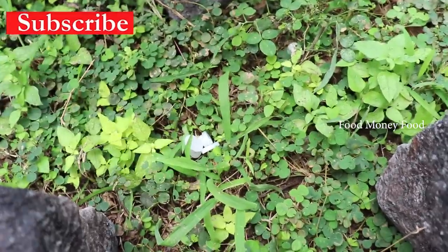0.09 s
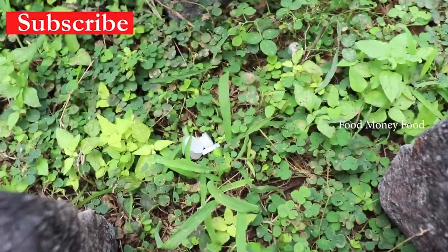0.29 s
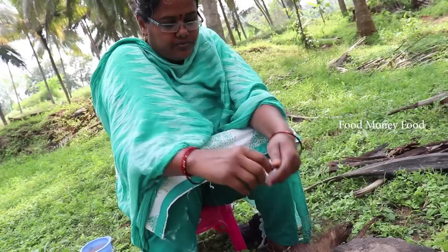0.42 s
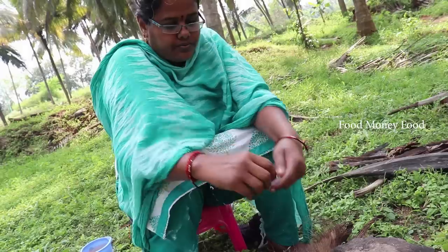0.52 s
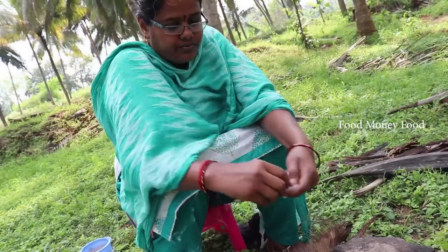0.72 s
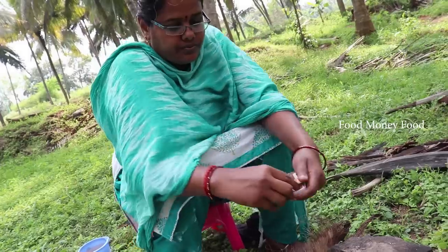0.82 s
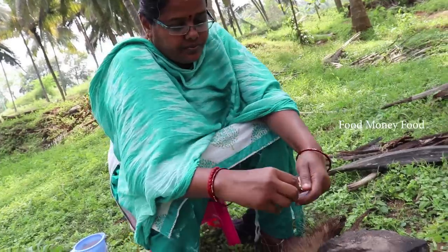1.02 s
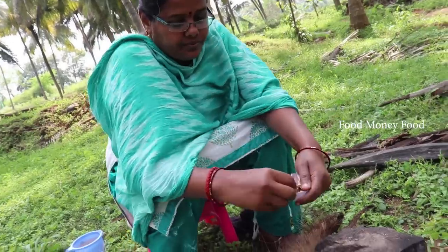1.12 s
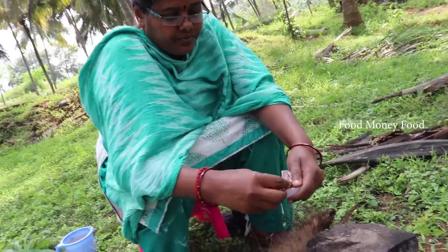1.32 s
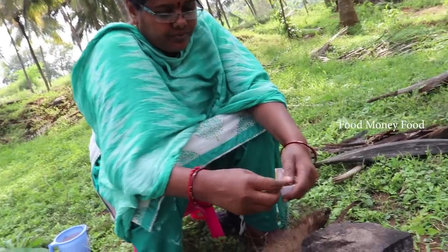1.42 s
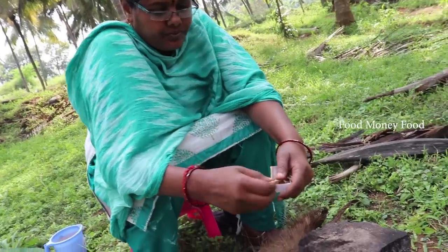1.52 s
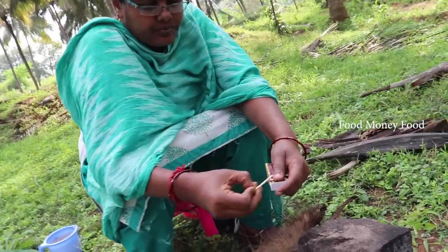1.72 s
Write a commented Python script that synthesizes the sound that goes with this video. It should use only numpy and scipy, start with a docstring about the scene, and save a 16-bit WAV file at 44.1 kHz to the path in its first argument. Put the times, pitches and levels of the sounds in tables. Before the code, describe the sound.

Matches rattle and scrape inside a small box, close to the microphone outdoors. A short hiss and hollow knock come first, then busy dry clicks with wind buffeting the left side, sparse soft rattles and a late hiss.

```python
"""Outdoors, close to a pair of hands, over the noise hiss of leaves and distance and a low rumble with a hum.
A short dry hiss and a rattle lead to a hollow knock on the ground: ringing sines over rough grit.
Matches then rattle and scrape in their box (clicks into resonances) among dry hisses (filtered noise) and
ticks (snaps of noise), while wind, lumpy low noise, buffets the left microphone port.
Sparse, soft rattles follow; near the end a longer hiss flares on the left."""
import sys
import numpy as np
from scipy import signal
from scipy.io import wavfile
from scipy.ndimage import uniform_filter1d

SR = 44100
rng = np.random.default_rng(int(sys.argv[2]) if len(sys.argv) > 2 else 0)


def pcm_store(signal):
    """Save signal as 16-bit PCM."""
    levels = np.round(np.clip(np.atleast_2d(signal), -1, 1) * 32767)
    wavfile.write(sys.argv[1], SR, levels.astype(np.int16).T)


N = 77175


def amp(db):
    """dB to gain."""
    return 10 ** (np.asarray(db) / 20)


def unit(x):
    """Scale to rms one."""
    return x / np.sqrt(np.mean(x ** 2) + 1e-20)


def level(rows, outside_db=None):
    """Gain along a (s, dB) curve; outside_db holds before and after it."""
    s, db = np.transpose(rows)
    return amp(np.interp(np.arange(N) / SR, s, db, outside_db, outside_db))


def at_hz(points, hz):
    """Read a spectrum on a log frequency axis."""
    points_hz, values = np.transpose(points)
    return np.interp(np.log(hz), np.log(points_hz), values)


def pan(left_minus_right_db):
    """Left and right gains."""
    return amp([[left_minus_right_db / 2], [-left_minus_right_db / 2]])


def shape(start_s, rise_s, hold_s, fall_s):
    """Linear rise, hold, exponential fall."""
    t = np.arange(N) / SR - start_s
    return np.clip(t / rise_s, 0, 1) * np.exp(-np.clip(t - rise_s - hold_s, 0, None) / fall_s)


def drift(rate_hz):
    """Slow random wander of about rms one, computed every 40 samples."""
    r = np.exp(-2 * np.pi * rate_hz * 40 / SR)
    white = rng.standard_normal(N // 40 + 2002)
    slow = signal.lfilter([1], [1, -2 * r, r * r], white)[2000:]  # skip the settling
    return np.interp(np.arange(N) / 40, np.arange(len(slow)), unit(slow - slow.mean()))


def resonance(x, hz, width_hz):
    """Two-pole resonator, peak gain one."""
    r = np.exp(-np.pi * width_hz / SR)
    gain = (1 - r * r) / 2
    return signal.lfilter([gain, 0, -gain], [1, -2 * r * np.cos(2 * np.pi * hz / SR), r * r], x)


def double_resonance(x, hz, width_hz, second_width_hz):
    """Two resonators in series on one frequency."""
    return resonance(resonance(x, hz, width_hz), hz, second_width_hz)


def butter(x, order, hz, kind):
    """Butterworth filter."""
    return signal.sosfilt(signal.butter(order, hz, kind, fs=SR, output="sos"), x)


def bands(spectrum, patchy_db, likeness):
    """Half-octave bands of stereo noise, each with its own level, flicker and left-right likeness; rms one."""
    lowest_hz, highest_hz = spectrum[0][0], spectrum[-1][0]
    edges_hz = lowest_hz * 2 ** np.arange(-.5, np.log2(highest_hz / lowest_hz) + .5, .5)
    white = rng.standard_normal((2, 2, N))  # neighbouring bands use separate noise
    out = 0
    for k, (low_hz, high_hz) in enumerate(zip(edges_hz, edges_hz[1:])):
        mid, side = butter(white[k % 2], 2, [low_hz, min(high_hz, SR * .45)], "band")
        hz = np.sqrt(low_hz * high_hz)
        alike = np.clip(at_hz(likeness, hz), -1, 1)
        gain = amp(at_hz(spectrum, hz) + patchy_db * drift(20.0))
        out = out + gain * (np.sqrt(1 + alike) * mid + np.sqrt(1 - alike) * side * [[1], [-1]])
    return unit(out)


# Air spectrum. Each row: frequency in Hz, relative density in dB per Hz.
AIR_SPECTRUM = [(30, -31), (55, -13.5), (110, -6), (235, -6), (440, -12), (900, -7.5), (2000, -9),
                (3400, -10.5), (4400, -16.5), (6500, -18.5), (9000, -25.5), (11500, -29), (15500, -32.5)]
# Air level before its trim. Each row: time in seconds, level in dB.
AIR_LEVEL_CURVE = [(0.0, -46), (0.37, -44.5), (0.73, -45.5), (1.028, -45), (1.276, -47), (1.55, -48),
                   (1.75, -45)]
# Left-right likeness of the air. Each row: frequency in Hz, correlation from -1 to 1.
AIR_LIKENESS = [(60, 0.96), (180, 0.82), (550, 0.6), (1650, 0.072), (4970, -0.035), (15000, -0.2)]
AIR_TRIM_DB = 1.5


def air():
    """Leaves and distance: broadband noise, alike left and right only at low frequencies."""
    noise = bands(AIR_SPECTRUM, patchy_db=1.0, likeness=AIR_LIKENESS)
    return amp(AIR_TRIM_DB) * level(AIR_LEVEL_CURVE) * noise


# Rumble spectrum. Each row: frequency in Hz, relative density in dB per Hz.
RUMBLE_SPECTRUM = [(29, -29), (50, -3), (81, 1.5), (300, -9), (480, -6.5), (531, -8.5), (716, -23),
                   (899, -20), (1500, -22), (1950, -27), (3300, -120)]
# Rumble level. Each row: time in seconds, level of the noise in dB.
RUMBLE_LEVEL_CURVE = [(0, -44), (.06, -45.5), (.13, -39), (.19, -40), (.26, -44.5), (.33, -45), (.44, -50),
                      (.47, -57.5), (1.75, -71.5)]
HUM_HZ, HUM_WIDTH_HZ, HUM_RE_NOISE_DB = 82, 2.9, -7.5


def rumble():
    """Low, nearly centred noise, plus a hum that wavers as noise through a narrow resonance does."""
    hum = unit(resonance(rng.standard_normal(N), HUM_HZ, HUM_WIDTH_HZ))
    noise = bands(RUMBLE_SPECTRUM, patchy_db=3.5, likeness=[(40, 1.0), (1500, 0.81)])
    return level(RUMBLE_LEVEL_CURVE) * pan(1.3) * (noise + amp(HUM_RE_NOISE_DB) * hum)


# Wind gusts before the port gains. Each row: time in seconds, level in dB.
WIND_LEVEL_CURVE = [(0.5, -51), (0.52, -43.5), (0.55, -73), (0.582, -51), (0.604, -56), (0.646, -58),
                    (0.67, -36.5), (0.688, -37.5), (0.708, -47), (0.804, -38.5), (0.874, -64), (0.896, -41),
                    (0.948, -58.5), (1.004, -38.5), (1.034, -60), (1.132, -55), (1.156, -91), (1.2, -75)]
WIND_HZ, WIND_WIDTH_HZ = 65, 32
WIND_LEFT_DB, WIND_RIGHT_DB = 5, -12.5


def wind():
    """Wind on the ports, mostly the left: lumpy low noise, its swells partly evened out."""
    lumps = unit(double_resonance(rng.standard_normal(N), WIND_HZ, WIND_WIDTH_HZ, 2 * WIND_WIDTH_HZ))
    power = uniform_filter1d(lumps ** 2, size=1200)
    lumps = lumps / np.sqrt(power + 0.26)
    return level(WIND_LEVEL_CURVE, outside_db=-105) * lumps * amp([[WIND_LEFT_DB], [WIND_RIGHT_DB]])


# Tiny ticks. Each row: start in seconds, level in dB, centre in Hz, width in Hz, left minus right in dB.
TICK_ROWS = [(0.2185, -37.5, 4830, 7000, 11), (.219, -37.5, 11600, 6000, -3), (0.3352, -41, 6730, 8000, 8),
             (0.509, -49, 7000, 5000, 8), (1.243, -58, 14300, 2500, -18), (1.2563, -46.5, 3980, 2000, 6),
             (1.566, -50, 7700, 4040, 13)]
TICK_S = 0.0018


def ticks():
    """Millisecond snaps of noise, each in one broad resonance."""
    noise = rng.choice([-1., 1.], N)
    out = 0
    for s, db, hz, width_hz, side_db in TICK_ROWS:
        snap = unit(double_resonance(noise, hz, width_hz, width_hz))
        out = out + amp(db) * pan(side_db) * snap * shape(s, TICK_S / 4, TICK_S / 2, TICK_S)
    return out


# Hiss bursts. Each row: start in seconds, rise in seconds, hold in seconds, fall time constant in seconds,
# level in dB before the band filter, lower edge in Hz, upper edge in Hz, left minus right in dB.
HISS_ROWS = [(0.11, 0.023, 0.092, 0.0036, -44, 3400, 15400, 5.5),
             (0.331, 0.0022, 0.031, 0.011, -44.5, 7000, 15000, -3),
             (0.4535, .0004, 0.029, 0.023, -36, 9400, 18000, -4),
             (0.552, .003, 0.032, 0.0045, -46, 6000, 16000, -8),
             (0.604, 0.0023, 0.026, .003, -42.5, 6000, 18000, -5),
             (0.687, 0.04, 0.0087, 0.0078, -38, 4800, 9800, 1),
             (1.005, 0.013, 0.012, 0.0075, -46.5, 5000, 16000, -5),
             (1.685, 0.033, 0.024, .01, -39.5, 5900, 18100, 12.5)]
# Hiss spectrum. Each row: frequency in Hz, relative density in dB per Hz.
HISS_SPECTRUM = [(1760, -29), (3000, 3), (4450, -8.5), (4800, -9.5), (7580, -11.5), (9520, -10.5),
                 (10300, -21), (15700, -16)]


def hisses():
    """Dry friction: bright noise, each burst between edges of its own."""
    noise = bands(HISS_SPECTRUM, patchy_db=-4.0, likeness=[(3000, 0.28), (15000, 0.18)])
    out = 0
    for s, rise_s, hold_s, fall_s, db, low_hz, top_hz, side_db in HISS_ROWS:
        burst = butter(noise, 2, [low_hz, min(top_hz, SR * .45)], "band")
        out = out + amp(db) * pan(side_db) * shape(s, rise_s, hold_s, fall_s) * burst
    return out


# Modes of the knocked object. Each row: strike in seconds, frequency in Hz, level in dB before panning,
# t60 in seconds once free.
KNOCK_MODES = [(.2142, 171, -13, .022), (.2149, 400, -9, .01), (.2146, 335, -23, .1),
               (.2135, 872, -25, .03), (.2135, 1020, -29, .03), (.214, 765, -30, .03),
               (.214, 1840, -30, .015), (.2132, 1400, -19, .012)]
KNOCK_SWELL_S, KNOCK_END_S, KNOCK_PAN_DB, KNOCK_RIGHT_LAG_S = .0006, .2208, 2, 0.00013
KNOCK_LOW_HZ = 75  # the knock is kept above this
GRIT_START_S, GRIT_RISE_S, GRIT_DB, GRIT_HZ, GRIT_FALL_S = 0.2102, 0.0024, -27.5, 2000, 0.0044


def knock():
    """Modes swell, hold while the contact lasts, then ring free; grit roughens them; the right wave lags."""
    t = np.arange(N) / SR - np.array([[0], [KNOCK_RIGHT_LAG_S]])
    ring = 0
    for s, hz, db, t60_s in KNOCK_MODES:
        envelope = shape(s, KNOCK_SWELL_S, KNOCK_END_S - s - KNOCK_SWELL_S, t60_s / np.log(1000))
        ring = ring + amp(db) * np.sin(2 * np.pi * hz * (t - s)) * envelope
    grit = unit(double_resonance(rng.choice([-1., 1.], N), GRIT_HZ, 0.38 * GRIT_HZ, 3.0 * GRIT_HZ))
    grit = np.stack([grit, np.roll(grit, int(KNOCK_RIGHT_LAG_S * SR))])
    grit_envelope = shape(GRIT_START_S, GRIT_RISE_S, KNOCK_END_S - GRIT_START_S - .004, GRIT_FALL_S)
    both = ring + amp(GRIT_DB) * grit * grit_envelope
    return butter(both, 2, KNOCK_LOW_HZ, "high") * pan(KNOCK_PAN_DB)


# Matchbox modes. Each row: frequency in Hz, width in Hz, relative gain in dB.
BOX_MODES = [(890, 180, 0.5), (1049, 237, 6), (1365, 540, -1), (1750, 265, -0.5), (2254, 293, -2),
             (2697, 240, -4), (3270, 350, -8), (3690, 210, -3.5), (4380, 540, -8.5), (5120, 210, -5.5),
             (5920, 910, -5.5), (7760, 2600, -35), (10500, 3000, -25)]
# Rattles and scrapes. Each row: start in seconds, length in seconds, drive level in dB, favoured frequency
# in Hz, spread in octaves, left minus right in dB.
RATTLE_ROWS = [(0.138, 0.013, -31, 880, 0.14, 4.5), (0.3135, 0.0047, -38.5, 1080, 1.14, 2),
               (0.327, 0.024, -43, 1300, 0.41, -1), (0.4555, 0.012, -37, 3300, 0.49, -1.5),
               (0.47, 0.038, -40.5, 3180, 0.45, -2), (0.508, 0.0024, -43, 2980, 1.4, 2),
               (0.5519, 0.015, -35.5, 2740, 0.87, -1), (0.561, 0.0063, -35, 2000, 0.47, -1),
               (0.569, 0.007, -28.5, 3600, 0.66, 3), (.572, 0.004, -28, 1040, 0.1, 4),
               (0.573, .003, -25, 2170, 0.32, -5), (0.579, 0.0097, -39, 1540, 0.88, 6),
               (0.6041, 0.003, -36.5, 2000, 0.63, 0), (0.6088, 0.0064, -28, 2330, 0.89, -1),
               (0.6158, 0.0017, -24.5, 2600, 0.19, -2), (0.6182, 0.0027, -30, 2520, 0.38, -5),
               (0.738, 0.025, -43, 1600, 0.73, -0.5), (0.865, 0.0043, -43.5, 3380, 0.38, -10),
               (0.91, 0.0029, -39, 3500, 0.4, -4), (0.9326, 0.0072, -30, 1770, 0.25, 1),
               (0.9338, 0.0015, -26.5, 3540, 0.17, -6), (0.9359, 0.0015, -32.5, 3740, 0.47, -1),
               (0.947, 0.005, -37.5, 2350, 0.54, -5), (0.999, 0.019, -41, 2450, 0.79, -2),
               (1.0174, 0.0026, -36, 2000, 0.28, -8), (1.02, 0.0027, -39.5, 2950, 0.73, -6),
               (1.025, 0.0093, -39.5, 1690, 1.2, 4), (1.037, 0.012, -45.5, 2600, 0.59, -8),
               (1.156, 0.026, -45.5, 2210, 0.68, 1), (1.175, 0.0033, -43, 2670, 0.64, -8),
               (1.332, 0.0046, -43, 2360, 0.63, -9), (1.541, 0.037, -42.5, 2680, 0.21, -6),
               (1.625, 0.042, -40, 2640, 0.19, -6), (1.685, 0.027, -47, 1860, 0.56, 1),
               (1.717, 0.029, -46.5, 2030, 0.57, 14)]
BOX_GAIN_DB, BOX_LIKENESS = 14.5, 0.56
GRAINS_PER_S, GRAIN_SPREAD_DB = 9000, 3.5
RATTLE_RISE_S, RATTLE_FALL_S = 0.0003, 0.0028
RATTLE_SAG_DB = -5  # loss of force from start to end of a rattle
SNAP_DB, SNAP_LONGEST_S = 18, .007  # a rattle shorter than this opens with one hard contact


def box():
    """Dense uneven clicks drive the box modes; each rattle favours the modes near its own pitch."""
    t = np.arange(N) / SR
    struck = rng.random(N) < GRAINS_PER_S / SR
    sizes = unit(struck * amp(GRAIN_SPREAD_DB * np.minimum(rng.exponential(1, N), 3)))
    strokes, snaps = [], []
    for s, length_s, db, _, _, side_db in RATTLE_ROWS:
        sag_db = RATTLE_SAG_DB * np.clip((t - s) / length_s, 0, 1)
        stroke = amp(db + sag_db) * shape(s, RATTLE_RISE_S, length_s, RATTLE_FALL_S) * pan(side_db)
        contact = (length_s < SNAP_LONGEST_S) * (np.arange(N) == int((s + RATTLE_RISE_S) * SR))
        strokes.append(stroke)
        snaps.append(amp(SNAP_DB) * contact * stroke)
    strokes, snaps = np.array(strokes), np.array(snaps)
    favoured_hz, spread_octaves = np.array(RATTLE_ROWS)[:, 3], np.array(RATTLE_ROWS)[:, 4]
    shared = rng.choice([-1, 1], N)
    out = 0
    for k, (hz, width_hz, db) in enumerate(BOX_MODES):
        weights = np.exp(-.5 * (np.log2(hz / favoured_hz) / spread_octaves) ** 2)
        own = rng.choice([-1, 1], (2, N))
        signs = np.sqrt(BOX_LIKENESS) * shared + np.sqrt(1 - BOX_LIKENESS) * own
        clicks = np.tensordot(weights, strokes, 1) * sizes * signs
        drive = clicks + np.tensordot(weights, snaps, 1) + 1e-18  # offset avoids denormals
        mode = double_resonance(drive, hz, width_hz, 4.9 * width_hz)
        out = out + (-1) ** k * amp(db + BOX_GAIN_DB) * mode  # neighbours in opposite polarity
    return out


def scene():
    """Hands close by, air all round."""
    return knock() + box() + hisses() + ticks() + air() + rumble() + wind()


LOW_CUT_HZ, TOP_CUT_HZ = 23, 15800


def record(dry):
    """The deepest bass rolls off, the top is cut steeply."""
    dry = butter(dry, 4, LOW_CUT_HZ, "high")
    return signal.sosfilt(signal.ellip(12, .5, 75, TOP_CUT_HZ, fs=SR, output="sos"), dry)


dry = scene()
out = record(dry)
pcm_store(out)
```